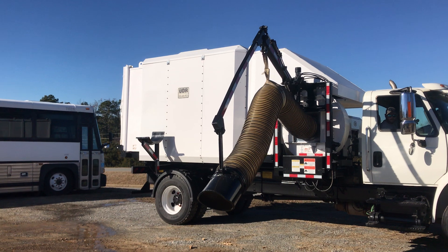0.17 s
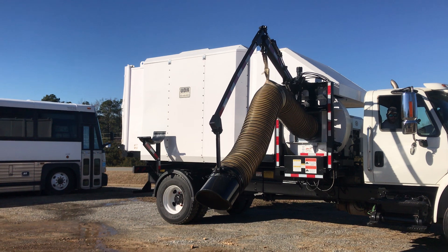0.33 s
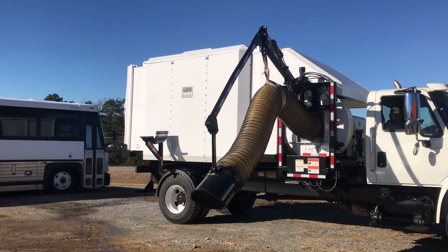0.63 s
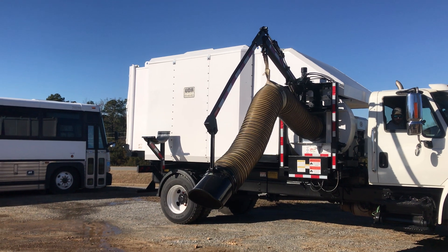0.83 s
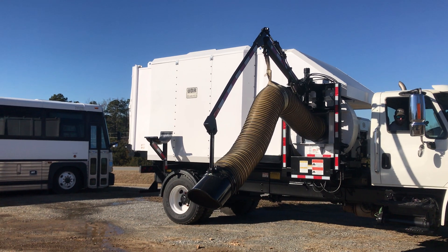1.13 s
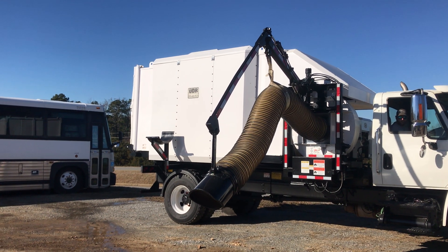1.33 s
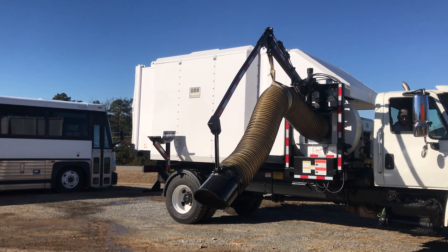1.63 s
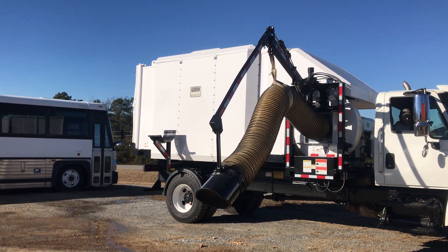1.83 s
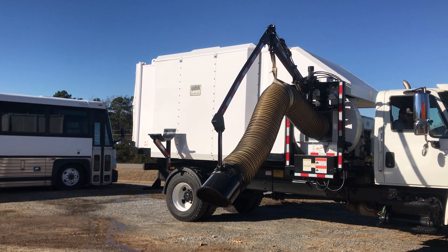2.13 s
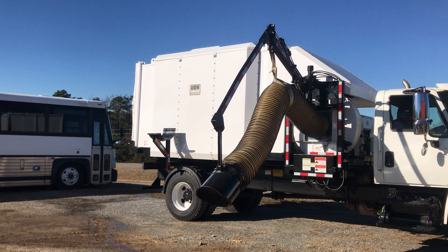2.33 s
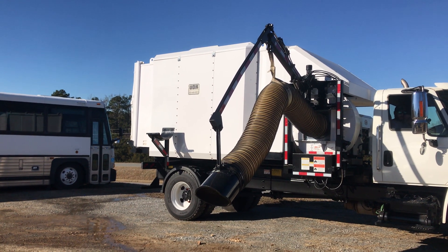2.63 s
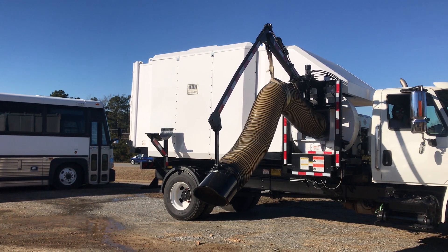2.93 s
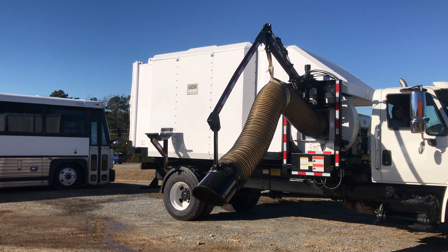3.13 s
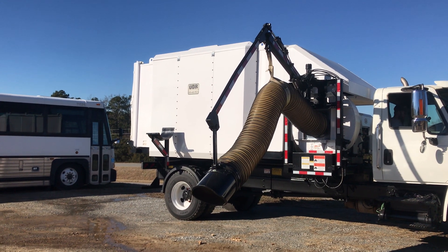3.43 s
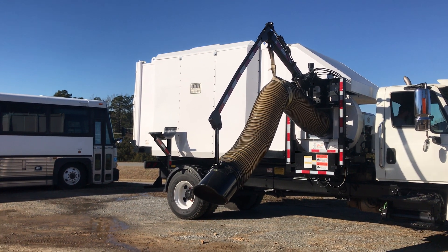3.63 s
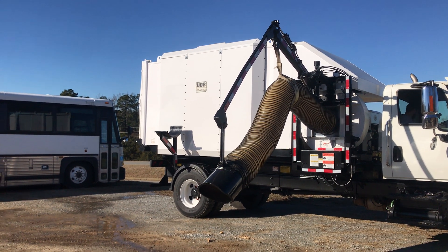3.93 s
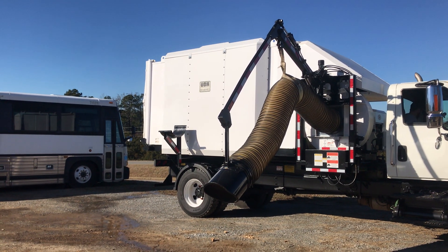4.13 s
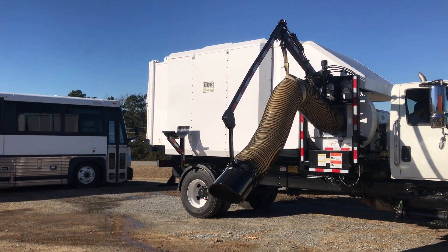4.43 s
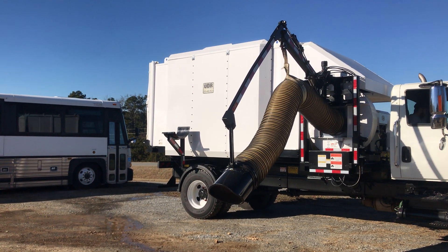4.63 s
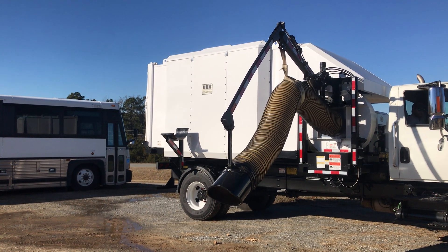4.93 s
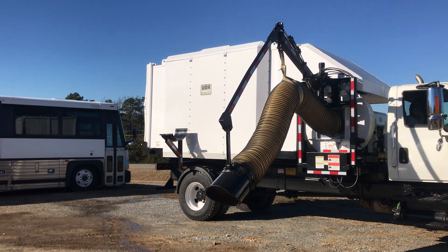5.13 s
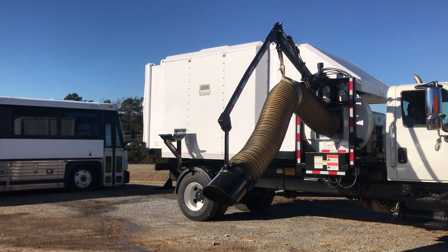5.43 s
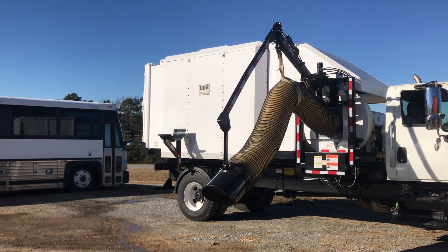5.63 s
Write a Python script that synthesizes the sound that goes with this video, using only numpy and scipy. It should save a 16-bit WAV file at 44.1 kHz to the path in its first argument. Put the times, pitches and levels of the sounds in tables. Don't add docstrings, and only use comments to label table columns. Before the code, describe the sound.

A truck engine and suction fan hold a steady low drone over roaring, hissing air, then sag in pitch near the end.

```python
import sys
import numpy as np
from scipy import signal
from scipy.fft import rfft, irfft, next_fast_len
from scipy.io import wavfile

SR = 44100
rng = np.random.default_rng(int(sys.argv[2]) if len(sys.argv) > 2 else 0)


def inscribe(sig):
    pcm = np.round(np.clip(np.atleast_2d(sig).T, -1, 1) * 32767)
    wavfile.write(sys.argv[1], SR, pcm.astype(np.int16))


def linear_from_db(decibels):
    return 10 ** (np.asarray(decibels, float) / 20)


N = 255427
SECONDS = np.arange(N) / SR

# time in seconds, speed in turns per second.
SHAFT_SPEED = [
    (0, 26.08),
    (2.5, 26.17),
    (4.86, 26.16),
    (5.08, 25.67),
    (5.4, 24.1),
    (5.79, 22.23),
]
# multiple of the shaft speed, level in dB.
UNEVEN_BLADES = [(1, -62), (5, -31.5), (7, -50), (8, -38), (9, -46), (10, -55), (11, -52.5), (13, -46.5),
                 (14, -47), (15, -48.5), (18, -50)]
# multiple of the shaft speed, level in dB.
PUMP_WHINES = [(24.8, -43), (30.2, -38.5), (32.25, -35)]
# centre in Hz, width in Hz, gain in dB.
PIPE_RESONANCES = [(47.5, 3, 5), (68, 6, 2), (100.5, 4, -12), (119, 8, -10), (139.5, 2.2, -14),
                   (134, 7, -3), (150, 9, 2.5), (272, 18, 20), (301, 14, 18)]
# centre in Hz, width in Hz, dB over the air noise.
HOUSING_RINGS = [(66.5, 8, -1.5), (93, 6.9, 2.5), (121, 8.9, 1.5), (135, 7.8, -3), (159, 10, -2.5),
                 (166, 12, 1.5), (227, 6.8, -2), (264.7, 9.2, 3), (345.3, 6.8, 7), (386.5, 13.3, 7.5),
                 (420, 17, -2.5), (645, 11, 4.5), (762, 12, 4.5), (813, 24, 2.5), (819, 11, 4),
                 (846, 22, -1), (1560, 26, 4), (1650, 41, 3), (2100, 26, 5.5), (2500, 58, 7),
                 (2665, 25, 6.5), (3040, 20, 7.5), (3940, 16, 6.5), (4170, 41, 5.5), (4550, 47, 6),
                 (4740, 130, 2), (5670, 190, 3)]
# frequency in Hz, level in dB per Hz.
RUMBLE_COLOUR = [(20, -30), (33, -18), (48, 3), (80, 4), (118, -3.5), (150, 9), (195, 0), (228, -2.5),
                 (300, 0), (390, -6.5), (415, -5), (470, -10), (530, -17.5), (620, -16)]
# frequency in Hz, level in dB per Hz.
ROAR_COLOUR = [(430, -43), (540, -14), (600, -0.5), (830, -1.5), (880, -3.5), (1050, -8.5), (1300, -7),
               (1550, -3.5), (1800, -3.5), (1950, -8), (2170, -8), (2300, -16.5), (2800, -35), (3300, -27)]
# frequency in Hz, level in dB per Hz.
HISS_COLOUR = [(2200, -13.5), (2900, -10), (3600, -11), (3900, -2.5), (4200, -2), (4700, -7.5), (5500, -15),
               (7300, -19.5), (7700, -22.5), (9600, -26), (10400, -35), (11200, -30.5), (13000, -34.5),
               (16000, -44)]

BLADES = 6
BELT_SLIP = .0028
IN_STEP_S = 2.6
FIRING_DB, FIRING_OCTAVE_DB = -23, -27
CRANK_3RD_DB, CRANK_6TH_DB = -38, -42
THROTTLE_S, THROTTLE_CLOSES_S, UNLOADED_DB = 4.5, .45, -3.5
WHINE_FADE_DB = 3.5
BLADE_DB, HALF_BLADE_DB, THIRD_BLADE_DB = -21, -32, -34
BLADE_OCTAVE_DB = -49
RUMBLE_DB, ROAR_DB, HISS_DB = -23, -22.5, -33.8
RUMBLE_FADE_DB, ROAR_FADE_DB, HISS_FADE_DB = -0.1, 0.4, 0.98
SETTLE_DB, SETTLE_S = -2, 0.25


def rms_one(x):
    return x / np.sqrt(np.mean(x ** 2) + 1e-20)


def drift(rate):
    step = 40
    r = np.exp(-2 * np.pi * rate * step / SR)
    noise = rng.standard_normal(N // step + 2002)
    slow = signal.lfilter([1], [1, -2 * r, r * r], noise)[2000:]
    return np.interp(np.arange(N) / step, np.arange(len(slow)), rms_one(slow))


def resonance(hz, centre_hz, width_hz, peak_db):
    return peak_db / (1 + (2 * (hz - centre_hz) / width_hz) ** 2)


def through_pipes(hz):
    return sum(resonance(hz, *row) for row in PIPE_RESONANCES)


def tone(turns, multiple, level_db, waver_db, wander):
    smear = (multiple - BLADES) ** 2 / 3
    phase = 2 * np.pi * multiple * turns + smear + wander * drift(2.2)
    level = linear_from_db(level_db + waver_db * drift(5.5))
    return np.sqrt(2) * level * np.cos(phase)


def engine(turns, speed):
    closed = np.clip((SECONDS - THROTTLE_S) / THROTTLE_CLOSES_S, 0, 1)
    load_db = UNLOADED_DB * closed ** 2
    firing_db = FIRING_DB + load_db + through_pipes(2 * speed)
    octave_db = FIRING_OCTAVE_DB + through_pipes(4 * speed)
    out = tone(turns, 2, firing_db, waver_db=0.25, wander=0.054)
    out += tone(turns, 4, octave_db, waver_db=0.5, wander=0.15)
    out -= tone(turns, 3, CRANK_3RD_DB + load_db, waver_db=2.0, wander=.1)
    out += tone(turns, 6, CRANK_6TH_DB + load_db, waver_db=1.5, wander=.1)
    return out


def pumps(turns, speed):
    fade_db = WHINE_FADE_DB * (speed - speed.max())
    return sum(tone(turns, k, db + fade_db, waver_db=2.5, wander=0.85) for k, db in PUMP_WHINES)


def blades(turns, speed):
    passing_hz = BLADES * speed
    passing_db = BLADE_DB + through_pipes(passing_hz)
    half_db = HALF_BLADE_DB + through_pipes(passing_hz / 2)
    octave_db = BLADE_OCTAVE_DB + through_pipes(2 * passing_hz)
    out = tone(turns, BLADES, passing_db, waver_db=0.5, wander=0.26)
    out += tone(turns, BLADES / 2, half_db, waver_db=0.0, wander=.15)
    out += tone(turns, BLADES / 3, THIRD_BLADE_DB, waver_db=1.3, wander=.1)
    out += tone(turns, 2 * BLADES, octave_db, waver_db=0.8, wander=0.093)
    for multiple, level_db in UNEVEN_BLADES:
        pipe_db = np.minimum(through_pipes(multiple * speed), 0)
        out += tone(turns, multiple, level_db + pipe_db, waver_db=1.2, wander=0.19)
    return out


def airflow(spectrum, shared_db, own_db, count):
    size = next_fast_len(N)
    hz = np.arange(1, size // 2 + 2) * SR / size
    points_hz, points_db = np.transpose(spectrum)
    colour = linear_from_db(np.interp(np.log(hz), np.log(points_hz), points_db, left=-90, right=-90))
    for row in HOUSING_RINGS:
        colour = colour * linear_from_db(resonance(hz, *row))
    coloured = rfft(rng.standard_normal(size)) * colour
    last = 3 * count
    place = np.clip(count * np.log2(hz / points_hz[0]), 0, last)
    out = np.zeros(N)
    for k in range(last + 1):
        share = np.clip(1 - abs(place - k), 0, 1)
        band = irfft(coloured * share, size)[:N]
        out += band * linear_from_db(own_db * drift(19.5))
    return rms_one(out * linear_from_db(shared_db))


def fan_air(turns, speed):
    lost = speed - speed.max()
    gust = drift(7.8)
    throb = np.cos(2 * np.pi * turns)
    puffs = np.maximum(drift(22.0) - .8, 0) ** 2
    rumble_swell = 0.12 * gust
    roar_swell = 0.22 * gust + 0.16 * throb + 0.59 * puffs
    hiss_swell = 0.16 * gust + 0.37 * throb + .7 * puffs
    rumble = airflow(RUMBLE_COLOUR, rumble_swell, own_db=-0.16, count=1)
    roar = airflow(ROAR_COLOUR, roar_swell, own_db=1.12, count=4)
    hiss = airflow(HISS_COLOUR, hiss_swell, own_db=0.95, count=4)
    out = linear_from_db(RUMBLE_DB + RUMBLE_FADE_DB * lost) * rumble
    out += linear_from_db(ROAR_DB + ROAR_FADE_DB * lost) * roar
    out += linear_from_db(HISS_DB + HISS_FADE_DB * lost) * hiss
    return out


def scene():
    times, speeds = np.transpose(SHAFT_SPEED)
    speed = np.interp(SECONDS, times, speeds)
    turns = np.cumsum(speed) / SR
    turns_in_step = np.interp(IN_STEP_S, SECONDS, turns)
    crank = turns + BELT_SLIP * (turns - turns_in_step)
    mix = engine(crank, speed) + pumps(turns, speed) + blades(turns, speed) + fan_air(turns, speed)
    return mix[None]


def band_limit(x):
    return signal.sosfilt(signal.butter(12, 15740, fs=SR, output="sos"), x)


def record(dry):
    settled = dry * linear_from_db(SETTLE_DB * np.exp(-SECONDS / SETTLE_S))
    rounded = 1.436 * np.tanh(settled / 1.547)
    return band_limit(rounded)


dry = scene()
out = record(dry)
inscribe(out)
```